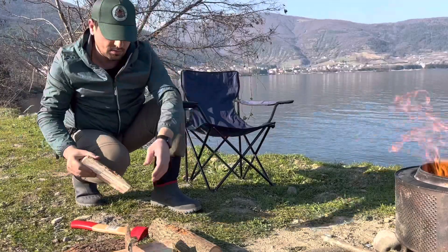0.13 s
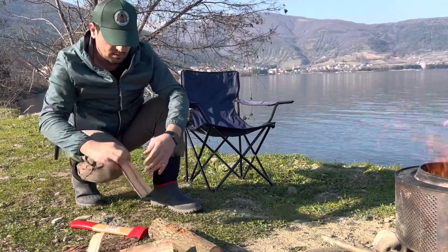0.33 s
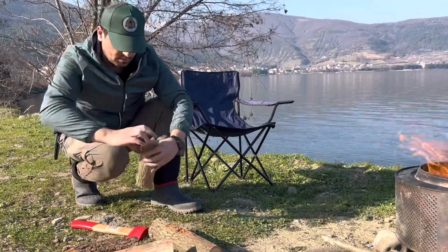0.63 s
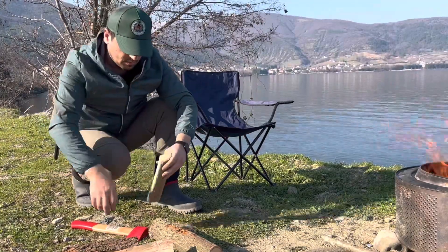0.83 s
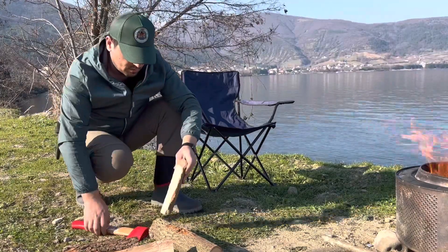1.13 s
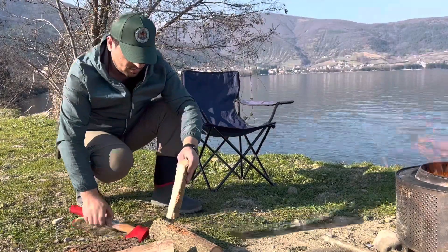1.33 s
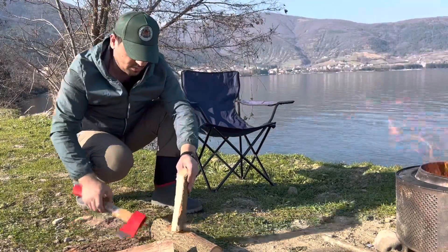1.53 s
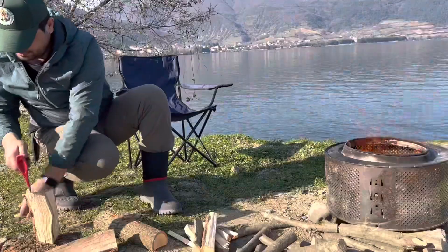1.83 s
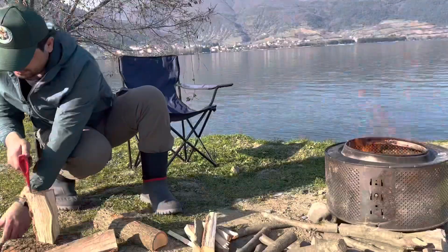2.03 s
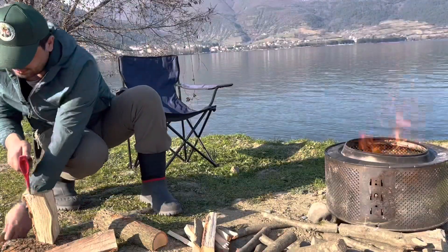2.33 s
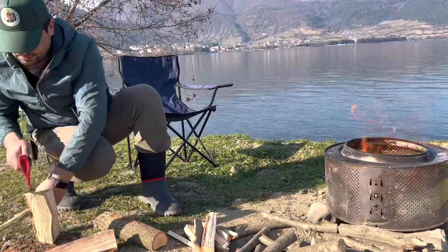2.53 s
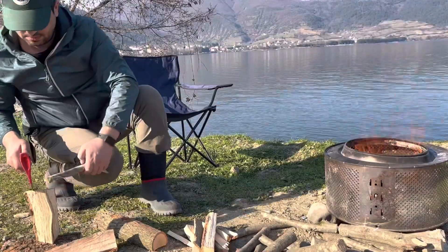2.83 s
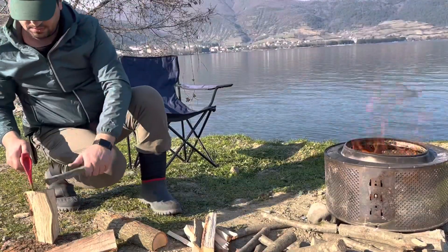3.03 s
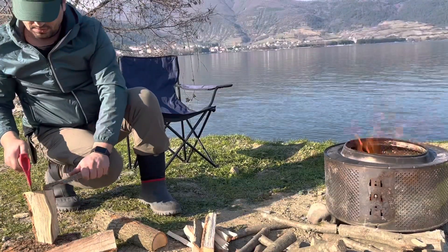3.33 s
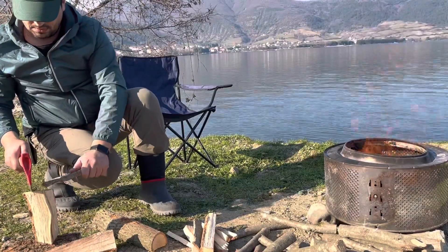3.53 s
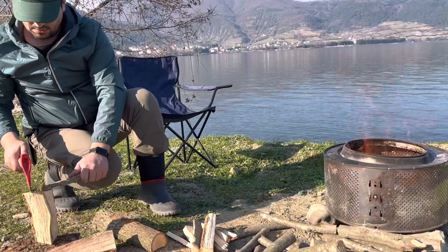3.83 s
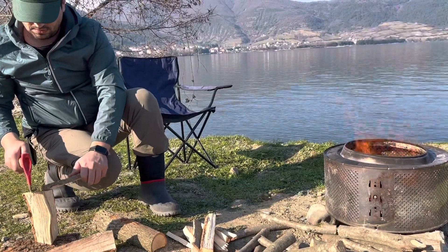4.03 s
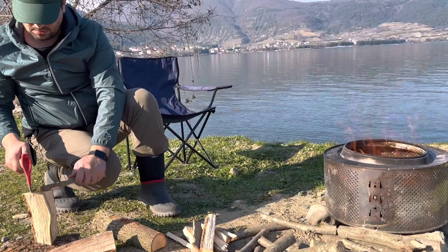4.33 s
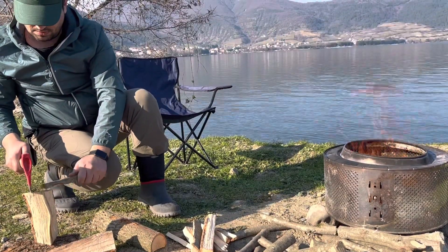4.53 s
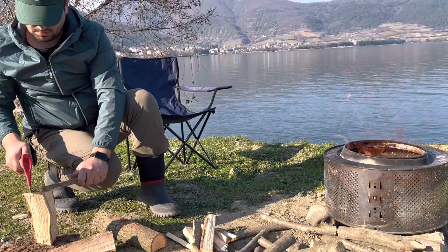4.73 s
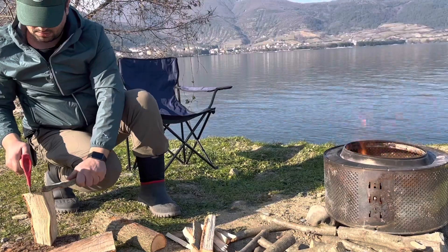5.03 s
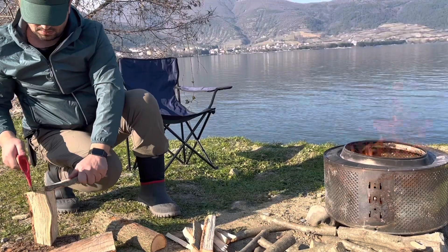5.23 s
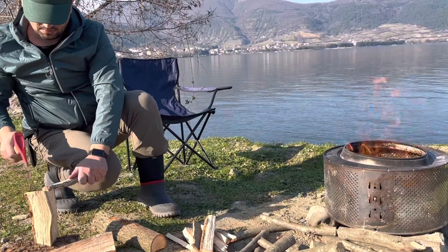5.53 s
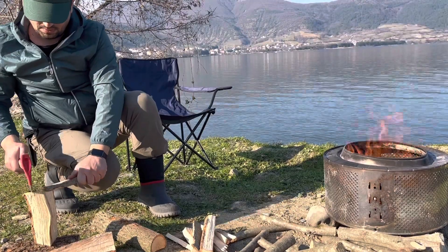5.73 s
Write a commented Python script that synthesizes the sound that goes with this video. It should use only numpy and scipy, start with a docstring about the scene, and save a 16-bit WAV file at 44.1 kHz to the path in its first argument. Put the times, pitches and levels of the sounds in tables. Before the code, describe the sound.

A hatchet chops wood in three short, thuddy cracks amid cloth rustle and fire ticks, while a low motor rush swells, then cuts off.

```python
"""Three sharp hatchet blows split kindling on a log by a lake, each a bite of steel, a dull thud and tearing
fibres. A jacket rustles, wood knocks and scuffs, sharp ticks and a fire snap nearby, and a distant motor
vehicle rushes and gathers speed, heard in a stretch that begins and ends abruptly. Blows are filtered clicks
with damped modes; fibres are grainy noise. Knocks and snaps are clicks with noise tails; scuffs and cloth are
swelling noise. The vehicle is a gliding sine in shaped noise, over an airy bed of noise that is stronger from
the moment the vehicle is heard."""
import sys
import numpy as np
from scipy import signal
from scipy.fft import rfft, irfft
from scipy.io import wavfile
from scipy.ndimage import uniform_filter1d

SR = 44100
rng = np.random.default_rng(int(sys.argv[2]) if len(sys.argv) > 2 else 0)


def dump(signal):
    """Clip the signal to [-1, 1] and save it as 16-bit WAV at the path in sys.argv[1]."""
    limited = np.clip(np.atleast_2d(signal).T, -1, 1)
    pcm = np.round(limited * 32767).astype(np.int16)
    wavfile.write(sys.argv[1], SR, pcm)


N = 259308
TIME = np.arange(N) / SR  # seconds
HIT_TIME = np.arange(8192) / SR  # seconds since a hit

# All spectrum levels are relative: they set the colour, and a separate level sets the loudness.
# The blows. Each row: thud start in seconds, thud level in dB, wood ring in dB, steel ring in dB, bite in dB,
# lead of the bite's start over the thud's in seconds, split in dB, split's 60 dB decay in seconds, splinters in dB.
BLOWS = [(1.6473, -2, -37, -40.5, -17, .0015, -33.5, 0.018, -48),
         (2.4518, -1.5, -22, -29, -22.5, .0017, -28.5, 0.039, -30.5),
         (5.0310, -1.5, -36, -36, -12.5, 0.000814, -21, 0.011, -43.5)]
# Colour of each blow's thud, set by where the blade sits in the wood. Each row: frequency in Hz, level in dB.
THUD_COLOURS = [
    [(40, -48), (150, -20.5), (220, -31), (320, -8.5), (450, -3), (560, 2), (700, -4), (880, -6.5),
     (1400, -19), (1800, -21), (2100, -17.5), (2800, -32.5), (6000, -55)],
    [(40, -24.5), (150, -14), (210, -18.5), (300, -3), (450, -1), (560, 4.5), (720, -1), (1100, -6.5),
     (1550, -17.5), (1950, -7.5), (2600, -34.5), (6000, -48)],
    [(40, -44.5), (130, -24), (200, -14.5), (350, -13), (480, -1), (600, 0.5), (800, 0.5), (1050, -7),
     (1600, -26), (2200, -22.5), (3000, -42.5), (6000, -61.5)],
]
# Colour of the steel edge biting. Each row: frequency in Hz, level in dB.
BITE_COLOUR = [(500, -23), (1500, 0.5), (2100, -11.5), (2900, -11.5), (4000, -3), (4900, 2), (5600, -4),
               (7500, -18.5), (12000, -23), (16000, -22)]
# Modes of the split billet. Each row: frequency in Hz, level in dB, 60 dB decay in seconds.
WOOD_MODES = [(430, -25.5, 0.21), (570, -11, 0.075), (842, 1.5, 0.076), (1214, 1, 0.0665),
              (1458, -12.5, 0.076), (1955, -17.5, 0.07), (3160, -20, 0.097)]
# Modes of the hatchet head. Each row: frequency in Hz, level in dB, 60 dB decay in seconds.
STEEL_MODES = [(1217, -3, .06), (3660, -11, .035), (4160, -12, .04), (4680, -3, .035), (5200, 0, .03),
               (5880, -12, .045), (6290, -19, .05)]
# Thump of the turf, alike for all blows. Each row: frequency in Hz, level in dB, 60 dB decay in seconds.
GROUND_MODES = [(73.7, -1.0, 0.096), (134.2, 5.5, 0.04), (309.6, -6.5, 0.0076)]
# Colour of the scattered tail, alike for all blows. Each row: frequency in Hz, level in dB.
SCATTER_COLOUR = [(200, 1.5), (400, 5), (750, -0.5), (1300, -10.5), (2200, -22.0), (5000, -18.5), (14000, -38.5)]
# Likeness of the channels in that tail. Each row: frequency in Hz, left-right likeness.
SCATTER_SAME = [(500, 0.62), (3000, 1.0)]
GROUND_DB, SCATTER_DB = -22.5, -30

# Wood gives way in three stages, timed from the bite: fibres are crushed, the grain splits, splinters tear off.
CRUSH_DB, CRUSH_T60_S, CRUSH_TILT_DB = -5, 0.014, -4.5  # level relative to the bite; tilts are per octave
SPLIT_AFTER_S, SPLIT_TILT_DB = .0038, 2.5
SPLINTER_AFTER_S, SPLINTER_T60_S, SPLINTER_TILT_DB = .0167, 0.027, -1.5
# Colour of breaking fibres, before the stage's tilt. Each row: frequency in Hz, level in dB.
CRACK_COLOUR = [(500, -15.5), (1500, -2), (2200, -8), (2900, -6.5), (4000, -3), (5000, -7), (6200, -4.5),
                (8000, -11), (11000, -9.5), (14000, -16.5), (16000, -14)]
# Balance of breaking fibres. Each row: frequency in Hz, left minus right in dB.
CRACK_SIDE = [(1000, 4), (3000, 2), (4800, 10.5), (7000, -0.5), (10000, -4.5)]

# Pieces of wood set down, nudged or falling. Each row: start in seconds, level in dB, pitch in Hz.
KNOCKS = [(1.143, -43, 790), (1.387, -54, 750), (1.430, -43, 725), (2.603, -27.5, 690), (2.653, -41, 554),
          (2.854, -45, 1100), (3.380, -46, 1090), (3.701, -30, 313), (5.083, -35, 4430)]
# Colour of a knock, before its tilt. Each row: multiple of the pitch, level in dB.
KNOCK_COLOUR = [(.3, -6), (.7, 5.5), (1, 9.5), (1.9, -0.5), (2.9, -10.5), (4.2, -11.5), (6, -19.5),
                (22, -34)]
KNOCK_T60_S, KNOCK_T60_SLOPE = 0.038, -.6  # decay at a 1 kHz pitch; smaller pieces die sooner
SIZE_TILT_DB = 1.05  # bigger pieces are duller: dB per octave for each octave of pitch
LIGHT_KNOCK_DB, HARDNESS = -43.5, 0.13  # harder is brighter: dB per octave for each dB above a light knock

# A billet scuffing over the log. Each row: middle in seconds, length in seconds, level in dB before flicker.
SCUFFS = [(.89, .11, -72.5), (1.15, 0.34, -76), (1.337, 0.074, -75.5), (5.54, .06, -59.5)]
# Colour of the scuffs. Each row: frequency in Hz, level in dB.
SCUFF_COLOUR = [(300, -5), (700, 5), (1200, 1.5), (2000, 0.5), (3000, -6), (4500, -13.5), (7000, -27),
                (14000, -35)]
# Strokes of the sleeves. Each row: middle in seconds, length in seconds, level in dB before flicker.
RUSTLES = [(0.086, 0.34, -76), (0.639, 0.27, -76), (1.05, 0.34, -75.5), (2.429, 0.29, -60.5),
           (3.164, 0.2, -63), (4.499, 0.3, -67), (5.12, 0.44, -62), (5.301, 0.26, -58.5),
           (5.615, 0.3, -64.5)]
# Colour of the cloth, before its tilt. Each row: frequency in Hz, level in dB.
CLOTH_COLOUR = [(500, -24), (1000, -9), (1800, 0.5), (2700, -1.5), (4800, 1.5), (6500, -2), (8000, -6.5),
                (11000, -7), (16000, -6)]
CLOTH_TILT_DB = 0.5  # per octave
# Likeness of the channels for close sounds. Each row: frequency in Hz, left-right likeness.
NEAR_SAME = [(1500, .8), (6000, 0.52), (8300, 1)]

# The clearest sharp ticks: snaps of the fire, and early on perhaps wood or a zip being handled.
# Each row: start in seconds, level in dB before the tick's boost.
SNAPS = [(0.5216, -50.5), (0.618, -49.5), (0.8593, -45.5), (1.194, -53), (1.5576, -51.5), (1.7587, -37.5),
         (1.943, -33), (3.3784, -41.5), (3.8214, -44.5), (4.0704, -37.5), (4.2882, -37), (4.704, -43),
         (4.9633, -44.5)]
# Colour of a snap. Each row: frequency in Hz, level in dB.
SNAP_COLOUR = [(600, -27.5), (2000, 1), (4500, 2.5), (7000, 2), (10000, 9), (14000, 7.5), (16000, 1)]
TICKS_PER_S, TICK_DB, TICK_SPREAD_DB = 2, -61, 3  # faint ticks at random times, spread either way in level

# The vehicle speeds up ever faster, and each of its sounds grows with the speed.
VEHICLE_START_S, VEHICLE_STOP_S = 1.611, 4.312
FIRING_START_HZ, FIRING_END_HZ, SPEED_POWER = 46.8, 60.3, 1.55  # pitch before a slight wobble
NOTE_DB, NOTE_GROWTH_DB = -49.5, 7
RUMBLE_DB, RUMBLE_GROWTH_DB = -48, 5
ROAR_DB, ROAR_GROWTH_DB = -56.5, 7.5
# Colour of the vehicle's rumble. Each row: frequency in Hz, level in dB.
RUMBLE_COLOUR = [(30, -17.5), (45, -16), (68, -1), (95, -1.5), (140, -8.5), (200, -10), (300, -14.5),
                 (500, -36.5), (1000, -77.5)]
# Likeness of the channels in the rumble. Each row: frequency in Hz, left-right likeness.
RUMBLE_SAME = [(60, 0.95), (130, 0.98), (350, 0.092)]
# Colour of the tyre roar. Each row: frequency in Hz, level in dB.
ROAR_COLOUR = [(150, -9.5), (330, 5.5), (600, 4.5), (800, 3), (920, -4.5), (1010, 9.5), (1130, 1.5),
               (1400, -3.5), (1850, -9.5), (2400, -28), (5000, -21), (9000, -51.5)]
# Balance of the roar. Each row: frequency in Hz, left minus right in dB.
ROAR_SIDE = [(300, 2), (700, -4), (1300, -7.5), (2400, 3.5)]
# Likeness of the channels in the roar. Each row: frequency in Hz, left-right likeness.
ROAR_SAME = [(300, 0.24), (900, 0.52), (2500, 0.17)]

# Colour of the open air before the vehicle starts. Each row: frequency in Hz, level in dB per Hz.
CALM_COLOUR = [(22, -22), (40, -3), (65, 2), (150, -5), (250, -13), (370, -21.5), (800, -28), (1100, -34.5),
               (2200, -46), (3500, -47), (8000, -53), (15500, -59)]
# Colour of the open air from then on. Each row: frequency in Hz, level in dB per Hz.
AIR_COLOUR = [(22, -20.5), (40, -5), (68, 2.5), (200, -15), (400, -23.5), (700, -25), (1100, -25.5),
              (1500, -33.5), (2300, -38), (4700, -35), (6500, -42), (10000, -37.5), (13000, -43.5),
              (15500, -44)]
CALM_DB, AIR_DB = -53.5, -50
# Likeness of the channels in the air. Each row: frequency in Hz, left-right likeness.
AIR_SAME = [(60, 1), (130, 0.91), (290, 0.97), (640, 0.072), (1400, 0.03), (3000, 0.38), (6000, 0.31),
            (8300, 1), (15000, 0.9)]
# Balance of the air, cloth and scuffs. Each row: frequency in Hz, left minus right in dB.
AIR_SIDE = [(60, 1), (2400, 1.5), (3200, 5), (3800, -0.5), (4800, 7), (6500, 0)]

# The two microphone ports. Each row: frequency in Hz, phase in radians by which the left one leads.
PORTS = [(20, 0), (120, .05), (280, .33), (1000, .35), (1450, 1.05), (1900, .1), (4000, 1.55), (5500, -.3),
         (8300, -3.14), (10000, -4.9), (11700, -6.28), (13200, -7.1), (15000, -9.4), (16500, -9.8)]
EDGE_HZ = 16100  # upper band limit


def blows():
    """The edge bites; the blow then drives a thud through the log, rings billet and blade, and shakes the ground."""
    out = np.zeros((2, N))
    for (s, thud_db, wood_db, steel_db, bite_db, lead, *_), colour in zip(BLOWS, THUD_COLOURS):
        bite = amp(bite_db) * bend(click(BITE_COLOUR), delay=0.00081)
        steel = amp(steel_db) * ring(STEEL_MODES, rise=0.00025)
        add(out, s - lead, (bite + steel) * panned(side_db=11.0))

        wood = amp(thud_db) * click(colour) + amp(wood_db) * ring(WOOD_MODES, rise=0.0018)
        add(out, s, bend(wood, delay=0.00057) * panned(side_db=3.0))

        # the log sinks into the turf a moment later
        ground = amp(GROUND_DB) * ring(GROUND_MODES, rise=0.0033)
        add(out, s + .006, ground * panned(side_db=1))

        # ground, woodpile and stove scatter a short tail; there are no walls
        scatter = noise(SCATTER_COLOUR, size=len(HIT_TIME), same=SCATTER_SAME)
        tail = amp(SCATTER_DB) * scatter * fade(t60=0.1, rise=0.00068)
        add(out, s + 0.0037, tail * panned(side_db=1.0))
    return out


def cracks():
    """Each blow crushes, splits and tears fibres: three decaying noise bursts with an uneven grain."""
    out = np.zeros((2, N))
    for s, *_, bite_db, lead, split_db, split_t60, splinter_db in BLOWS:
        stages = [(0, bite_db + CRUSH_DB, CRUSH_T60_S, CRUSH_TILT_DB),
                  (SPLIT_AFTER_S, split_db, split_t60, SPLIT_TILT_DB),
                  (SPLINTER_AFTER_S, splinter_db, SPLINTER_T60_S, SPLINTER_TILT_DB)]
        for after, db, t60, tilt_db in stages:
            burst = noise(CRACK_COLOUR, size=len(HIT_TIME), same=NEAR_SAME, side=CRACK_SIDE, tilt_db=tilt_db)
            grain = uniform_filter1d(rng.standard_normal(len(HIT_TIME)), size=24)
            grain_db = 3.83 * evened(grain)
            add(out, s - lead + after, amp(db) * burst * amp(grain_db) * fade(t60, rise=0.00072))
    return out


def knocks():
    """Light, dead contacts of wood on wood: a tap and a short rattle."""
    out = np.zeros((2, N))
    for s, db, hz in KNOCKS:
        t60 = KNOCK_T60_S * (hz / 1000) ** KNOCK_T60_SLOPE
        tilt_db = HARDNESS * (db - LIGHT_KNOCK_DB) + SIZE_TILT_DB * np.log2(hz / 1000)
        colour = [(hz * multiple, level + tilt_db * np.log2(multiple)) for multiple, level in KNOCK_COLOUR]
        tap = bend(click(colour), delay=0.00091)
        rattle = noise(colour, size=len(HIT_TIME), same=NEAR_SAME) * fade(t60, rise=0.00064)
        add(out, s, amp(db) * (tap + amp(-11) * rattle) * panned(side_db=4.5))
    return out


def scuffs():
    """Rough wood drags over bark in small, grainy scrapes."""
    flicker_db = 4.9 * drift(per_s=36) + 2.35 * drift(per_s=530)
    return patchy(strokes(SCUFFS, SCUFF_COLOUR), depth_db=2) * amp(flicker_db)


def jacket():
    """Nylon slides over itself in swelling strokes that catch and slip."""
    flicker_db = 1.3 * drift(per_s=30) + 1.2 * drift(per_s=900)
    return strokes(RUSTLES, CLOTH_COLOUR, CLOTH_TILT_DB) * amp(flicker_db)


def snaps():
    """Sharp ticks with a brief fizz: mostly pockets popping in the fire's steel drum, early on perhaps handling."""
    out, tick = np.zeros((2, N)), click(SNAP_COLOUR)
    chance = rng.random((round(TICKS_PER_S * N / SR), 2))
    faint = [(when * N / SR, TICK_DB + TICK_SPREAD_DB * (2 * size - 1)) for when, size in chance]
    for s, db in list(SNAPS) + faint:
        fizz = noise(SNAP_COLOUR, size=len(HIT_TIME)) * fade(t60=0.021, rise=0.00028)
        add(out, s, amp(db) * (amp(7.0) * tick + amp(-11.5) * fizz))
    return out


def vehicle():
    """A rising engine note in its rumble; the tyres roar mostly from the right, with a quick random flutter in level."""
    progress = np.clip((TIME - VEHICLE_START_S) / (VEHICLE_STOP_S - VEHICLE_START_S), 0, 1)
    speed = progress ** SPEED_POWER  # share of the speed gained
    hz = FIRING_START_HZ + (FIRING_END_HZ - FIRING_START_HZ) * speed
    turns = np.cumsum(hz * (1 + 0.015 * drift(per_s=3))) / SR
    note_db = NOTE_DB + NOTE_GROWTH_DB * speed + 2.0 * drift(per_s=5.3)
    note = amp(note_db) * evened(np.sin(2 * np.pi * turns))

    rumble_db = RUMBLE_DB + RUMBLE_GROWTH_DB * speed + 0.44 * drift(per_s=18)
    rumble = amp(rumble_db) * noise(RUMBLE_COLOUR, same=RUMBLE_SAME)

    roar_db = ROAR_DB + ROAR_GROWTH_DB * speed + 1.2 * drift(per_s=50)
    roar = amp(roar_db) * noise(ROAR_COLOUR, same=ROAR_SAME, side=ROAR_SIDE, lag=0.00059)
    return ((note + rumble) * panned(side_db=1.5) + roar) * during(VEHICLE_START_S, VEHICLE_STOP_S)


def air():
    """Low outdoor rumble with a faint hiss, stronger from the moment the vehicle is heard; it dips briefly
    where the vehicle's sound begins and ends."""
    calm = amp(CALM_DB) * noise(CALM_COLOUR, same=AIR_SAME, side=AIR_SIDE) * during(0, VEHICLE_START_S)
    later_gate = during(VEHICLE_START_S, VEHICLE_STOP_S) + during(VEHICLE_STOP_S, np.inf)
    later = amp(AIR_DB) * noise(AIR_COLOUR, same=AIR_SAME, side=AIR_SIDE) * later_gate
    return (calm + later) * amp(1.7 * drift(per_s=8.6))


def strokes(rows, colour, tilt_db=0):
    """Rubbing noise that swells and fades with each stroke."""
    out = np.zeros((2, N))
    for s, length, db in rows:
        size = int(length * SR)
        rub = noise(colour, size=size, same=NEAR_SAME, side=AIR_SIDE, tilt_db=tilt_db)
        stroke = rub * np.hanning(size) ** .5
        start = s - length / 2
        skipped = max(int(-start * SR), 0)  # samples that would fall before time 0
        add(out, max(start, 0), amp(db) * stroke[:, skipped:])
    return out


def bend(x, delay):
    """Bending waves in wood travel faster the higher they are; delay (s) is the lag at 500 Hz."""
    hz = np.fft.rfftfreq(len(x), 1 / SR)
    spread = irfft(rfft(x) * np.exp(-4j * np.pi * delay * np.sqrt(500 * hz)), len(x))
    return spread * np.minimum(np.linspace(2, 0, len(x)), 1)  # fades out over the second half


def patchy(x, depth_db):
    """Patches of the spectrum swell and sink at random, each on its own."""
    z = signal.stft(x, nperseg=512)[2]
    field = uniform_filter1d(rng.standard_normal(z.shape[1:]), size=7, axis=0)  # across frequency
    field = uniform_filter1d(field, size=4, axis=1)  # across time
    return signal.istft(z * amp(depth_db * evened(field)), nperseg=512)[1][:, :N]


def click(colour):
    """The causal response of a spectrum to a single tap, peak 1."""
    hz = abs(np.fft.fftfreq(len(HIT_TIME), 1 / SR))
    log_gain = np.log(amp(read(colour, hz)))
    tap = np.fft.ifft(np.exp(np.conj(signal.hilbert(log_gain)))).real  # minimum phase
    return tap / abs(tap).max()


def fade(t60, rise):
    """Envelope of a hit: a quick rise, then an exponential decay (both in seconds)."""
    return (1 - np.exp(-HIT_TIME / rise)) * np.exp(-np.log(1000) * HIT_TIME / t60)


def ring(modes, rise):
    """Damped modes set going by one blow."""
    return sum(amp(db) * fade(t60, rise) * np.sin(2 * np.pi * hz * HIT_TIME) for hz, db, t60 in modes)


def noise(colour, size=N, same=((1, 0),), side=((1, 0),), tilt_db=0, lag=0):
    """Stereo noise of rms 1 with a spectrum, a likeness and balance of the channels, and a lag (s) on the left."""
    hz = np.fft.rfftfreq(size, 1 / SR)
    a, b = rng.standard_normal((2, len(hz))) + 1j * rng.standard_normal((2, len(hz)))
    c = np.clip(read(same, hz), -1, 1)
    left = a * np.exp(-2j * np.pi * hz * lag)
    right = c * a + np.sqrt(1 - c ** 2) * b
    z = np.array([left, right])
    z *= amp(read(colour, hz) + tilt_db * np.log2(hz + 1)) * panned(read(side, hz))
    z *= np.minimum(hz / colour[0][0], 1) ** 2  # nothing far below the lowest point
    return evened(irfft(z, size))


def drift(per_s):
    """Random wander of rms 1; per_s sets how fast it moves, in Hz."""
    hz = np.fft.rfftfreq(N, 1 / SR)
    return evened(irfft(rfft(rng.standard_normal(N)) * np.exp(-(hz / per_s) ** 2), N))


def during(start, stop):
    """Gate that is 1 between two times, with a 3 ms fade at each end."""
    return np.clip(np.minimum(TIME - start, stop - .004 - TIME) / .003, 0, 1)


def amp(db):
    """Decibels to gain."""
    return 10 ** (np.asarray(db) / 20)


def evened(x):
    """Scales to rms 1."""
    return x / np.sqrt(np.mean(x ** 2) + 1e-20)


def read(points, hz):
    """Reads a spectrum on a log-frequency axis."""
    f, value = np.transpose(points)
    return np.interp(np.log(hz + 1e-3), np.log(f), value)


def panned(side_db):
    """Left and right gains for a level difference, left minus right."""
    return amp(np.array([[.5], [-.5]]) * side_db)


def add(mix, s, sound):
    """Mixes a sound in at time s."""
    part = mix[:, round(s * SR):][:, :sound.shape[-1]]
    part += sound[..., :part.shape[1]]


def scene():
    """All sources at the microphone."""
    background = patchy(air() + vehicle() + jacket(), depth_db=1.6)
    return background + scuffs() + snaps() + knocks() + cracks() + blows()


def record(dry):
    """Deep bass is cut, the ports hear the treble out of step, loud peaks are rounded off, then the band limit."""
    hz = np.fft.rfftfreq(N, 1 / SR)
    bass_cut = signal.butter(4, 36, "highpass", fs=SR, output="sos")
    left, right = signal.sosfilt(bass_cut, dry)
    left = irfft(rfft(left) * np.exp(1j * read(PORTS, hz)), N)
    pair = np.array([left, right])
    rounded = pair / (1 + (pair / .92) ** 8) ** (1 / 8)
    band_limit = signal.firwin(511, EDGE_HZ, window=("kaiser", 9), fs=SR)
    return signal.oaconvolve(rounded, band_limit[None], "same")


dry = scene()
out = record(dry)
dump(out)
```